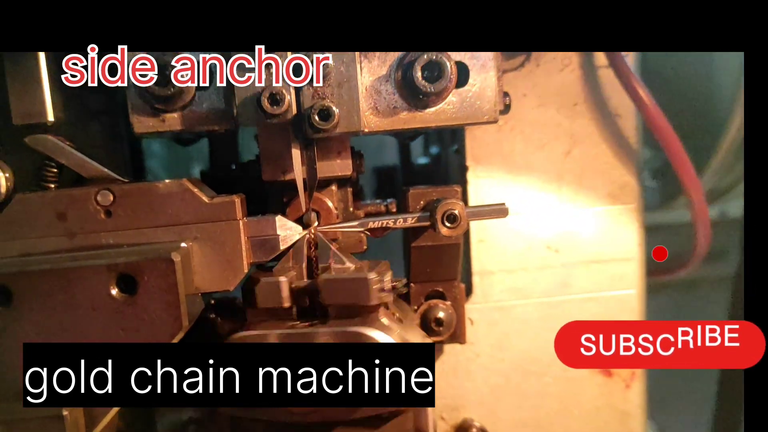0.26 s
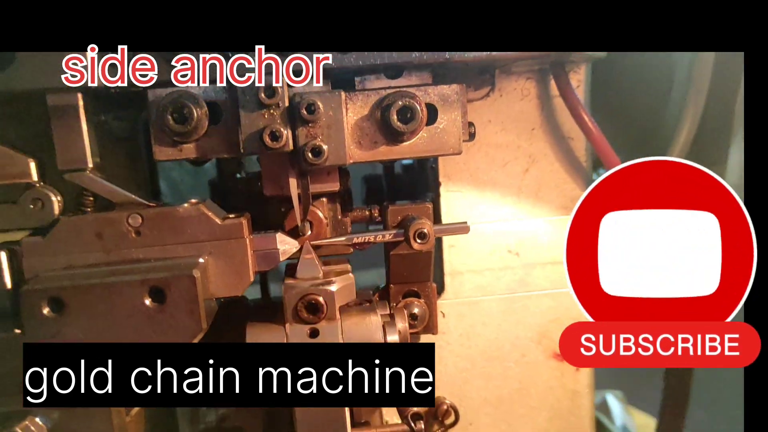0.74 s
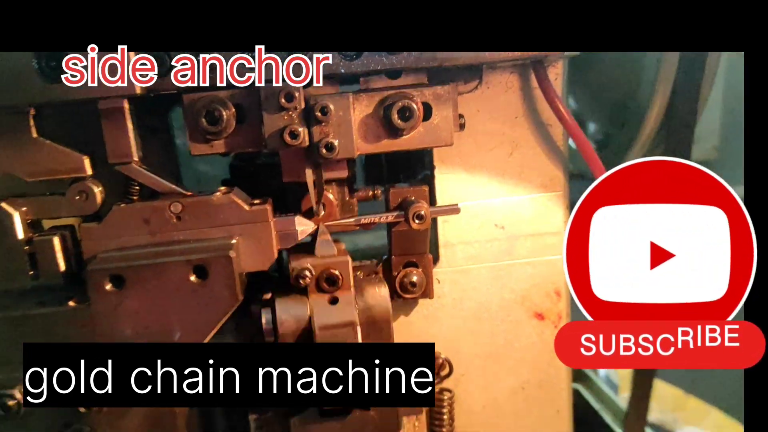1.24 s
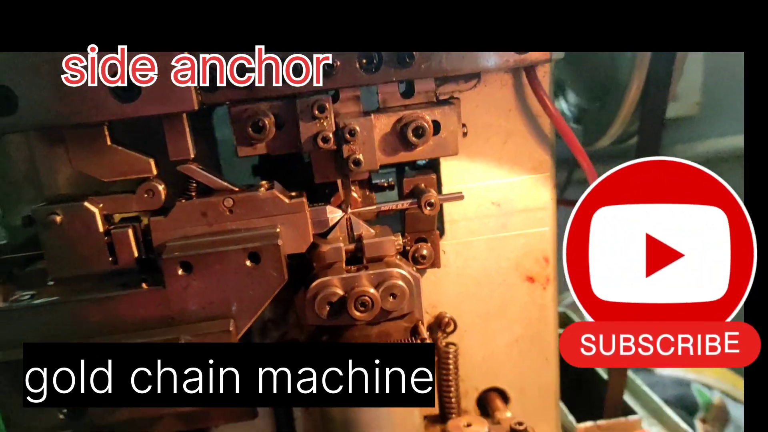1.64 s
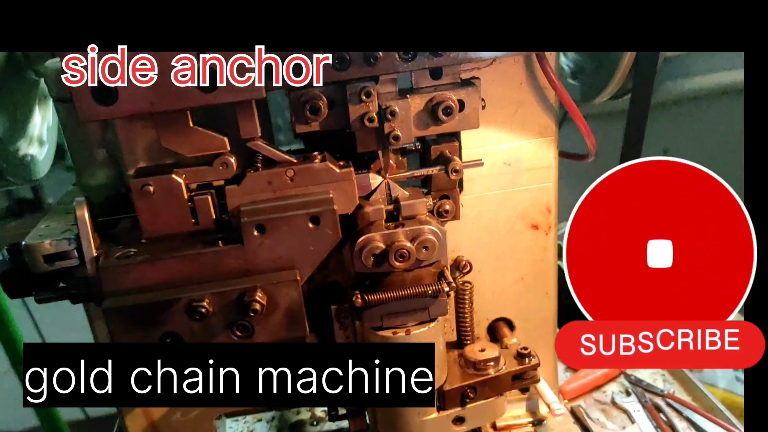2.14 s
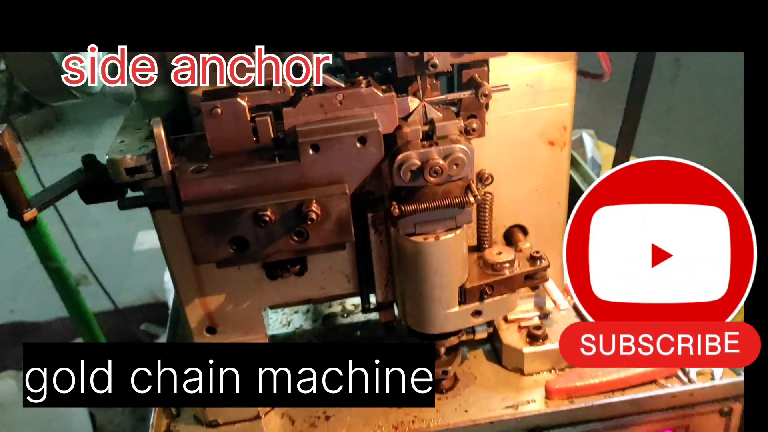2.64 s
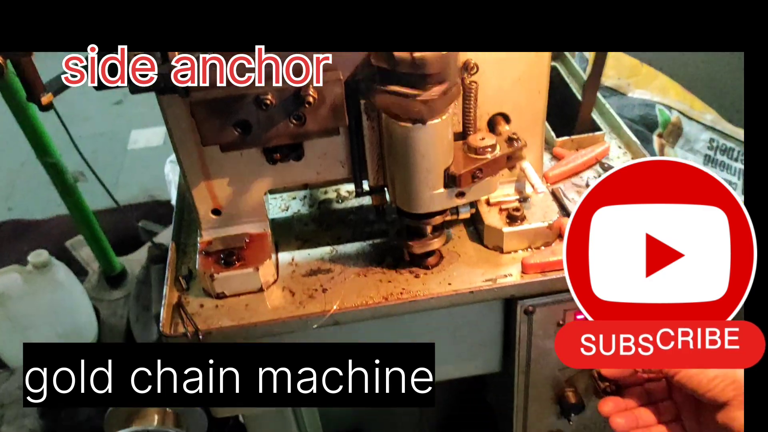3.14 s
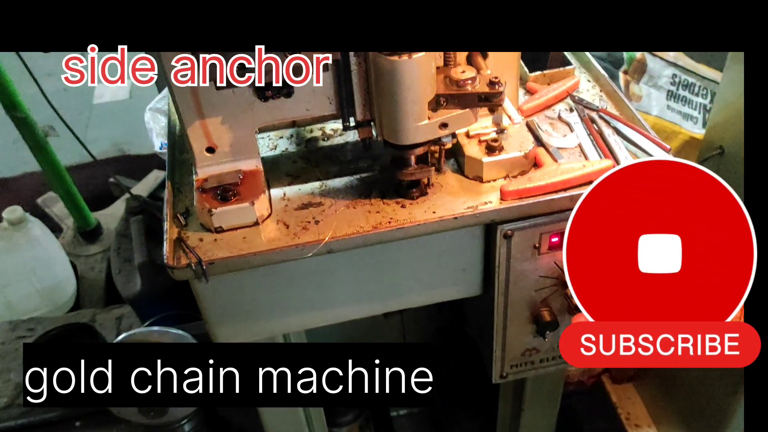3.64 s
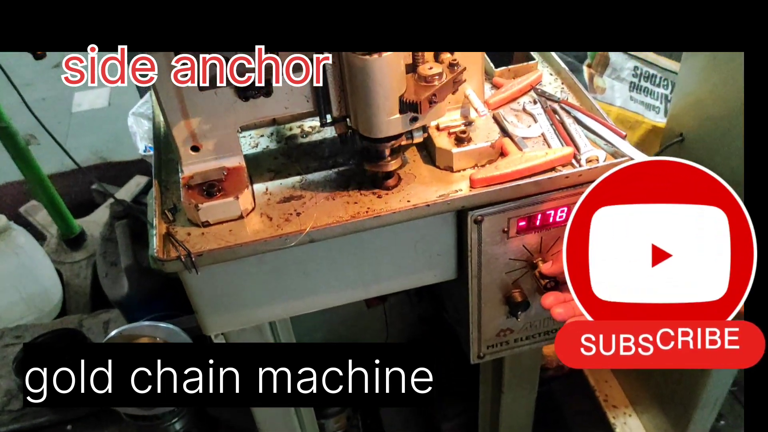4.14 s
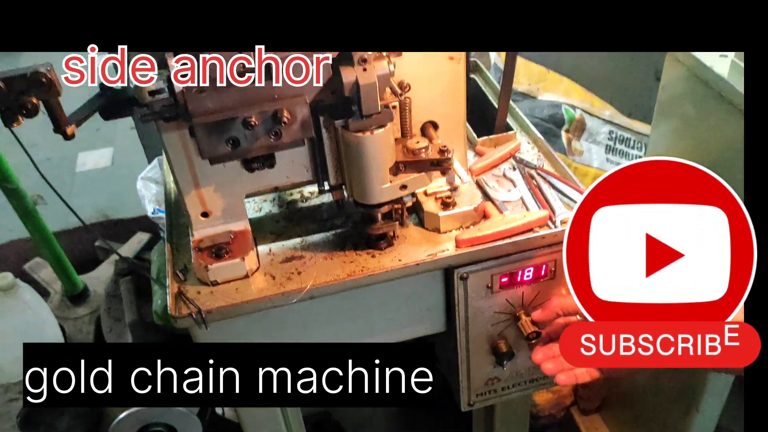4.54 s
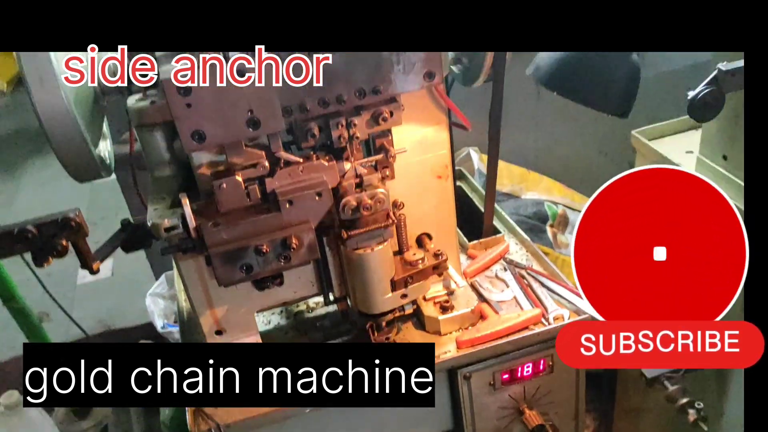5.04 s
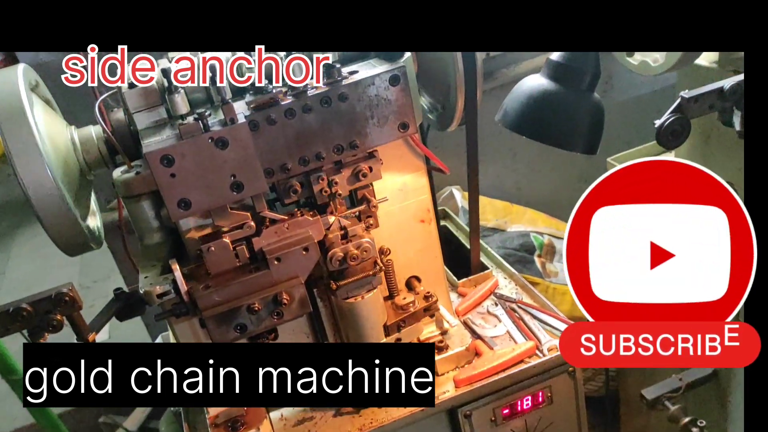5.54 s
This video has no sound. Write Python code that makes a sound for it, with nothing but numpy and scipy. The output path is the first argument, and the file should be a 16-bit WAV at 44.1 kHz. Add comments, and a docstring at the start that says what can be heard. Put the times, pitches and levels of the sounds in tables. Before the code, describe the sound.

A small chain-making machine clatters in a workshop, steel levers clanking and jaws snapping over a motor hum, speeding up within moments and then running steadily.

```python
"""A motor hum and a steady clatter of steel: a chain-making machine, close by in a small workshop, speeds up.
On every turn of the camshaft the same cams knock on the iron frame, clank the levers and swish the slides,
harder at higher speed. About once a turn the forming head snaps as it cuts a link. Other loose parts clack,
scrape and jangle; gears and wire feed tick underneath, and bench and walls throw the clatter back.
Most parts are bursts of noise rung through a filter; hum and knocks are sine waves."""
import sys
import numpy as np
from scipy import signal
from scipy.fft import rfft, irfft
from scipy.io import wavfile
from scipy.ndimage import uniform_filter1d

SR = 44100
rng = np.random.default_rng(int(sys.argv[2]) if len(sys.argv) > 2 else 0)


def transcribe(u):
    """Save the signal u as a 16-bit wav file named by the first command-line argument.

    u: samples, shape (n,) or (channels, n), limited to [-1, 1]; the rate is SR.
    q: integer samples, one column per channel.
    """
    v = np.clip(np.atleast_2d(u).T, -1, 1)
    q = np.round(v * 32767).astype(np.int16)
    wavfile.write(sys.argv[1], SR, q)


N = 255339
TIME = np.arange(N) / SR  # seconds
TURNS = np.arange(7)  # numbered turns of the camshaft
FULL_TURNS_PER_S = 1.2

# progress of the camshaft, which speeds up and then holds its pace: time_s, turns_made
CAMSHAFT = [(-1.19, -.5), (.233, .5), (.55, 0.6544), (.68, 0.8053), (.916, 1), (1.185, 1.2942),
            (1.488, 1.5), (1.765, 1.68), (2.025, 2), (2.491, 2.5), (2.96, 3), (3.38, 3.5), (3.82, 4),
            (4.224, 4.5), (4.655, 5), (5.062, 5.5), (5.5, 6), (6.5, 7)]
# knocks of the cams on the frame on every turn: place_turns, relative level_db, ring_hz
CAM_KNOCKS = [(.355, -27.5, 149), (.455, -33.5, 168), (0.649, -33, 157), (0.879, -23, 234)]


def amp(db):
    """Turns decibels into a plain gain."""
    return 10 ** (np.asarray(db) / 20)


def evened(x):
    """Scales to an rms of 1."""
    return x / np.sqrt(np.mean(x ** 2) + 1e-20)


def read(points, hz):
    """Reads a table of values against pitch, with pitch spaced by ratio."""
    f, value = np.transpose(points)
    return np.interp(np.log(hz + 1), np.log(f + 1), value)


def level(table):
    """Gain over time from a dB curve."""
    return amp(np.interp(TIME, *np.transpose(table)))


def add(mix, s, sound):
    """Mixes a sound in at time s."""
    part = mix[:, max(round(s * SR), 0):][:, :sound.shape[-1]]
    part += sound[..., :part.shape[-1]]


def colour(x, spectrum, ripple_db=0, size=2048, count=70):
    """Rings x through a causal filter of unit energy; random ripples give each part its own resonances."""
    hz = abs(np.fft.fftfreq(size, 1 / SR))
    ripples = np.interp(np.sqrt(hz), np.linspace(0, np.sqrt(SR / 2), count), 2 * rng.random(count) - 1)
    log_gain = np.log(amp(read(spectrum, hz) + ripple_db * ripples))
    # the phase that makes the filter answer as early as it can
    response = np.exp(np.conj(signal.hilbert(log_gain)))
    ring = np.fft.ifft(response).real[:size // 2]
    return signal.oaconvolve(x, ring[None] / np.linalg.norm(ring), axes=1)[:, :N]


def flutter(slow_hz, fast_hz, count=40):
    """Random wavering of rms 1: many slow sine waves with random starting points."""
    coarse = TIME[::64]
    rates_hz = np.geomspace(slow_hz, fast_hz, count)
    waves = sum(np.sin(2 * np.pi * (f * coarse + rng.random())) for f in rates_hz)
    return np.interp(TIME, coarse, evened(waves))


def impacts(size, per_s, spread_db, ring_s):
    """A run of small collisions of uneven force, each a brief burst that dies away."""
    force = amp(spread_db * np.minimum(rng.exponential(1, size), 3))
    force = force * (rng.random(size) < per_s / SR)
    power = signal.lfilter([1], [1, -np.exp(-2 / (ring_s * SR))], force ** 2)
    return evened(np.sqrt(power) * rng.standard_normal((2, size)))


def moment(turn):
    """Time at which the camshaft has made a given number of turns."""
    s, turns = np.transpose(CAMSHAFT)
    return np.interp(turn, turns, s)


def pace(turn):
    """Speed of the camshaft over one turn, in doublings from full speed."""
    return -np.log2((moment(turn + .5) - moment(turn - .5)) * FULL_TURNS_PER_S)


def effort(speed_db, load_db):
    """Gain over time: speed_db more per doubling of speed, and a load that swings twice a turn."""
    slack_at = 0.22  # place in the turn where the load first eases
    turn = np.interp(TIME, *np.transpose(CAMSHAFT))
    load = -np.cos(2 * np.pi * 2 * (turn - slack_at))
    return amp(speed_db * pace(turn) + load_db * load)


def every_turn(cams, speed_db, uneven_db):
    """Repeats a table of cams on each turn: rows of (s, gain, seconds per turn, the cam's other columns)."""
    rows = []
    for place, *rest in cams:
        turn = TURNS + place
        gain = amp(speed_db * pace(turn) + uneven_db * rng.standard_normal(len(turn)))
        turn_s = 2 ** -pace(turn) / FULL_TURNS_PER_S
        beats = zip(moment(turn), gain, turn_s)
        rows += [(*beat, *rest) for beat in beats if 0 <= beat[0] < N / SR]
    return rows


def snaps(tail_db=-10, tail_s=0.013, crack_db=-5):
    """Jaws and grippers crack brightly, strike again within milliseconds and ring on briefly."""
    # hard snaps of the forming head, at each cut and when a link catches:
    # start_s, relative level_db, chatter_s
    hard_snaps = [(0.2154, -19.5, 0.005), (0.2698, -16.5, 0.003), (0.574, -21.5, 0.0022),
                  (0.8845, -13, 0.0062), (0.9166, -10.5, 0.0035), (0.970, -22, 0.004), (1.351, -22, 0.002),
                  (1.5183, -11.5, 0.0023), (2.026, -9, 0.0014), (2.0918, -15, 0.0022),
                  (2.371, -16.5, 0.0037), (2.562, -18.5, 0.00088), (2.8083, -16, 0.0021),
                  (2.861, -14.5, 0.00091), (2.9593, -6.5, 0.0044), (3.724, -15.5, 0.0035),
                  (3.8215, -5.5, 0.0039), (4.6553, -9.5, 0.0055), (5.203, -19, 0.0045),
                  (5.4875, -8.5, 0.0042)]
    # light clicks of the grippers on every turn: place_turns, relative level_db, chatter_s
    light_clicks = [(.045, -20, 0.0031), (.075, -19, 0.0055), (.37, -20, 0.006), (.487, -26, .005),
                    (.668, -23, 0.0056), (.834, -22, 0.0069), (.886, -27, 0.0053), (.975, -19, 0.0085)]
    # colour of the jaws: pitch_hz, level_db
    jaw_colour = [(300, -21), (1200, -3), (2300, 4.5), (3100, -0.5), (4000, 5), (6500, 0.5), (8100, 1),
                  (10200, -24.5), (16000, -39)]
    crack_colour = [(3000, 3), (7500, -1), (10500, -20)]  # pitch_hz, level_db
    strike_s = .0011  # fade of one strike

    out, t = np.zeros((2, N)), TIME[:SR // 12]
    hard = [(s, amp(db), chatter_s) for s, db, chatter_s in hard_snaps]
    clicks = every_turn(light_clicks, speed_db=12, uneven_db=-0.5)
    light = [(s, gain * amp(db), chatter_s) for s, gain, _, db, chatter_s in clicks]
    for s, force, chatter_s in hard + light:
        again = chatter_s * np.array([0, rng.uniform(.2, .45), rng.uniform(.55, .8), 1])
        strikes = np.max([(t >= at) * np.exp(-abs(t - at) / strike_s) for at in again], axis=0)
        tail = amp(tail_db) * np.exp(-t / tail_s)
        chatter = rng.standard_normal((2, len(t))) * (strikes + tail)
        # the first crack is the same on both sides
        crack = rng.standard_normal(len(t)) * np.exp(-2 * t / strike_s) * np.ones((2, 1))
        ringing_jaws = colour(chatter, jaw_colour, ripple_db=3.5)
        add(out, s, force * (ringing_jaws + amp(crack_db) * colour(crack, crack_colour)))
    return amp(-7.5) * out


def levers(swell_s=0.00081, fall_s=0.026):
    """A lever meets its stop and rattles to rest in a run of tiny collisions."""
    # clanks of the levers on every turn: place_turns, relative level_db
    clanks = [(.003, -21), (.076, -21), (.156, -21.5), (.38, -22), (.482, -21.5), (.592, -21.5),
              (.664, -23), (.865, -18.5), (.9, -21)]
    # colour of the levers: pitch_hz, level_db
    lever_colour = [(200, -6.5), (1200, 5), (2600, 1), (3200, -3.5), (4200, -1.5), (7000, -12.5),
                    (10000, -36), (16000, -41)]
    out, t = np.zeros((2, N)), TIME[:SR // 6]
    shape = (1 - np.exp(-t / swell_s)) * np.exp(-t / fall_s)
    for s, gain, _, db in every_turn(clanks, speed_db=9.5, uneven_db=-0.5):
        rattle = impacts(len(t), per_s=500, spread_db=0.4, ring_s=0.0099)
        add(out, s, gain * amp(db) * colour(rattle * shape, lever_colour, ripple_db=1.0))
    return amp(-4) * out


def slides():
    """Each stroke or drag of a slide is a short, gritty swish with a colour of its own."""
    # strokes of the steel slides on every turn: place_turns, length_turns, relative level_db
    slide_strokes = [(.01, .07, -37.5), (.15, 0.039, -32.5), (.215, 0.05, -34.5), (.328, .075, -31),
                     (.48, 0.079, -34.5), (.727, 0.047, -34), (.82, 0.033, -31)]
    # further swishes, when the slides drag, at their own times: start_s, length_s, relative level_db
    slide_drags = [(0.236, 0.041, -36), (0.419, 0.074, -36), (1.708, 0.055, -35), (2.81, 0.064, -28.5),
                   (2.968, 0.071, -30), (4.089, 0.052, -32.5), (5.33, 0.098, -29.5)]
    # colour of the slides: pitch_hz, level_db
    slide_colour = [(1500, -13), (3300, -2.5), (4200, -9), (6400, 6), (8200, -4), (9080, -11),
                    (9700, -34.5), (16000, -32)]
    out = np.zeros((2, N))
    repeated = every_turn(slide_strokes, speed_db=2.5, uneven_db=-0.5)
    strokes = [(s, turns * turn_s, gain * amp(db)) for s, gain, turn_s, turns, db in repeated]
    scrapes = [(s, length_s, amp(db)) for s, length_s, db in slide_drags]
    for s, length_s, force in strokes + scrapes:
        size = round(max(length_s, .005) * SR)
        grit = impacts(size, per_s=2200, spread_db=1.2, ring_s=0.006)
        grit = grit * signal.windows.tukey(size, .5)  # soft start and end
        add(out, s, force * colour(grit, slide_colour, ripple_db=3.5, count=200))
    return out


def knocks(ring_s=0.035, swell_s=0.0097, thump_s=0.0167, thump_hz=212):
    """Each cam knock swells and dies in a low mode of the frame; the thumps of the ram die sooner."""
    # heavy thumps of the ram through the bench: start_s, relative level_db
    ram_thumps = [(0.087, -24), (1.34, -26), (2.084, -21.5), (2.403, -19), (2.863, -23), (4.197, -20.5),
                  (4.567, -27), (4.981, -22), (5.404, -22)]
    out, t = np.zeros((2, N)), TIME[:SR // 5]
    repeated = every_turn(CAM_KNOCKS, speed_db=1.5, uneven_db=0.0)
    cams = [(s, gain * amp(db), hz, ring_s) for s, gain, _, db, hz in repeated]
    ram = [(s, amp(db), thump_hz, thump_s) for s, db in ram_thumps]
    for s, force, hz, fall_s in cams + ram:
        shape = (1 - np.exp(-t / swell_s)) * np.exp(-t / fall_s)
        add(out, s, force * np.sin(2 * np.pi * hz * t) * shape / shape.max())
    return amp(-3.0) * out


def clacks(bounce_s=0.003, bounce_db=-3, fall_s=.0012, count=4):
    """A loose part falls against its stop, bounces a few times and rings in its own modes."""
    # clacks of loose steel parts: start_s, relative level_db, main_ring_hz
    part_clacks = [(0.269, -24, 2400), (.474, -26, 1510), (1.003, -20.5, 1780), (1.518, -21, 2700),
                   (2.41, -23, 1620), (2.584, -24, 1800), (2.846, -19.5, 1890), (3.302, -25, 1730),
                   (3.858, -22, 1960), (5.377, -19, 1690)]
    # colour of a loose part: multiple of the main ring, level_db
    part_colour = [(.25, -15), (1, 3), (1.3, -8), (3, -10), (8, -60)]
    out, t = np.zeros((2, N)), TIME[:SR // 16]
    for s, db, hz in part_clacks:
        strikes = np.zeros((2, len(t)))
        for k in range(count):
            burst = rng.standard_normal((2, len(t))) * np.exp(-t / fall_s)
            add(strikes, bounce_s * k, amp(bounce_db * k) * burst)
        body = [(hz * multiple, gain_db) for multiple, gain_db in part_colour]
        add(out, s, amp(db) * colour(strikes, body, ripple_db=6.0, count=160))
    return amp(2.5) * out


def jangle(lean_db=-7, count=6):
    """Small steel pieces tumble together, each with its own high resonances; the clatter swells and thins out."""
    # one jangle of loose steel, off to the right: start_s, length_s, relative level_db
    s, length_s, db = (5.028, 0.078, -20.5)
    # colour of the small pieces: pitch_hz, level_db
    piece_colour = [(1000, -12), (2400, -2), (6500, 3.5), (9500, -10.5), (16000, -26)]
    out = np.zeros((2, N))
    u = np.linspace(0, 2, round(2 * length_s * SR))
    swell = evened(u ** 2 * np.exp(-7 * u))
    for _ in range(count):
        hits = impacts(len(u), per_s=220, spread_db=2.5, ring_s=.0015)
        add(out, s, colour(hits * swell, piece_colour, ripple_db=11, count=200))
    return amp(db) * amp([[lean_db], [0]]) * out / count  # left side weaker


def motor():
    """A magnetic hum that wavers at random in level and phase, over low tones that grow with speed."""
    # level of the motor hum: time_s, level_db
    hum_level = [(0, -37), (.75, -39), (1.6, -32.5), (1.9, -36), (2.85, -31.5), (3.85, -32.5),
                 (4.25, -28.5), (4.8, -35.5), (5.79, -33.5)]
    # weaker low tones of frame and motor at full speed: pitch_hz, level_db
    low_tones = [(143, -46), (333, -44)]
    hum_hz = 200.2
    wavering = amp(2.0 * flutter(2, 22))
    hum = wavering * np.sin(2 * np.pi * hum_hz * TIME + .38 * flutter(.8, 14))
    tones = sum(amp(db) * np.sin(2 * np.pi * hz * TIME + 1.78 * flutter(0.311, 5.8))
                for hz, db in low_tones)
    # a sine's peak is root 2 times its rms
    return np.sqrt(2) * (level(hum_level) * hum + tones * effort(speed_db=6.5, load_db=0))


def frame(surge=0.23, surge_s=0.024):
    """The turning camshaft keeps the iron frame rumbling, hardest just after each knock."""
    # colour of the frame: pitch_hz, level_db
    frame_colour = [(20, -25), (45, -19.5), (110, -14.5), (150, -3), (240, 2), (310, -5.5), (400, -15.5),
                    (700, -13.5), (2000, -114.5)]
    shake = evened(colour(rng.standard_normal((2, N)), frame_colour))
    blows = np.concatenate([moment(TURNS + place) for place, _, _ in CAM_KNOCKS])
    coarse = TIME[::64]
    surges = sum(np.exp(-((coarse - s) / surge_s - .5) ** 2) for s in blows)
    load = np.interp(TIME, coarse, surges)
    wavering = amp(1.83 * flutter(3, 24))
    return amp(-33.0) * shake * effort(speed_db=1.0, load_db=1.0) * (1 + surge * load) * wavering


def gears():
    """Gears and cam followers grumble and tick without a pause, as a dense run of small collisions."""
    # colour of the gears: pitch_hz, level_db
    gear_colour = [(150, -26), (350, -1.5), (480, -0.5), (660, -3.5), (810, 0), (1100, -3), (2600, -8.5),
                   (3300, -14), (5200, -18), (7400, -8), (9800, -36.5), (16000, -48.5)]
    mesh = impacts(N, per_s=1000, spread_db=2.6, ring_s=.0075)
    grumble = evened(colour(mesh * amp(0.26 * flutter(5.5, 45)), gear_colour))
    return amp(-30.5) * grumble * effort(speed_db=2.0, load_db=-0.24)


def feed(count=8):
    """The wire feed and the finished chain tick lightly against several steel guides."""
    # level of the feed rattle, which grows overall as the machine speeds up: time_s, relative level_db
    feed_level = [(0, -54), (1.6, -41.5), (2.75, -50), (3, -36), (3.8, -33), (4.7, -33), (5.2, -35),
                  (5.79, -33.5)]
    # colour of the guides: pitch_hz, level_db
    guide_colour = [(1200, -14), (2400, 2.5), (3300, -4.5), (4200, -1), (5200, 3), (6500, 2), (8000, -6),
                    (10000, -18), (16000, -38)]
    ticks = [impacts(N, per_s=50, spread_db=2.0, ring_s=.007) for _ in range(count)]
    rattle = evened(sum(colour(guide, guide_colour, ripple_db=5.5) for guide in ticks))
    return rattle * level(feed_level) * effort(speed_db=1.0, load_db=1.5)


def rustles():
    """Thin, gritty hiss of steel rubbing, quick to start and slow to fade."""
    # rustles of steel: start_s, length_s, relative level_db
    steel_rustles = [(3.006, 0.86, -56)]
    out = np.zeros((2, N))
    for s, length_s, db in steel_rustles:
        u = np.maximum(TIME - s, 0) / (length_s / 4)
        swell = u * np.exp(1 - u)
        out += amp(db) * swell * impacts(N, per_s=300, spread_db=2.5, ring_s=.004)
    return colour(out, [(2000, -27), (8000, 7), (13000, -1.5), (16000, -13)])  # pitch_hz, level_db


def ringing(x, patch_db, count=12, size=1024):
    """Random narrow patches of pitch and time rise and fall, mostly in the treble."""
    overlap = size - size // 4
    hz, _, z = signal.stft(x, SR, nperseg=size, noverlap=overlap)
    # partly shared by the two sides
    patches = rng.standard_normal(z.shape[1:]) + .5 * rng.standard_normal(z.shape)
    patches = uniform_filter1d(patches, count, axis=2)
    patches = evened(uniform_filter1d(patches, size=3, axis=1))
    depth = np.clip(hz / 3500, 0, 1)[:, None] ** .4
    gain = amp(patch_db * depth * np.clip(patches, -2, 2))
    gain /= np.sqrt(np.mean(gain ** 2, axis=(0, 2), keepdims=True))
    return signal.istft(z * gain, SR, nperseg=size, noverlap=overlap)[1][:, :N]


def room(x):
    """Scattered reflections from bench and walls die away quickly."""
    t60_s = 0.17  # time to fall by 60 dB
    t = TIME[:SR // 2]
    tail = rng.standard_normal((2, len(t))) * (t > .004) * amp(-60 * t / t60_s)
    return signal.fftconvolve(x, tail / np.linalg.norm(tail[0]), axes=1)[:, :N]


def spread(x):
    """Long waves reach both ears much alike; short ones arrive nearly unrelated."""
    # how alike left and right are: pitch_hz, likeness (0 to 1)
    likeness = [(60, 0.49), (130, 0.95), (290, 0.95), (640, 0.41), (1500, 0.033)]
    a, b = rfft(x)
    same = np.clip(read(likeness, np.fft.rfftfreq(N, 1 / SR)), -1, 1)
    return irfft(np.array([a, same * a + np.sqrt(1 - same ** 2) * b]), N)


def scene():
    """Mixes the machine, its echoes and its motor."""
    head, loose, works = snaps() + jangle(), clacks(), levers() + slides()
    echo = room(amp(-3) * (head + loose) + amp(-5.5) * works)
    steel = ringing(gears() + feed() + works + rustles() + echo, patch_db=4.4)
    return spread(frame() + steel + head + loose) + motor() + knocks()


def record(dry):
    """The two microphone ports have their own colour; then the highest treble is cut off."""
    # balance of the two sides: pitch_hz, left_minus_right_db
    balance = [(60, 0.5), (200, 4), (2400, 0), (4000, 2), (6400, -5.5), (8100, 5), (10000, -2)]
    edge_hz = 15800
    lean_db = read(balance, np.fft.rfftfreq(N, 1 / SR))
    ports = irfft(rfft(dry) * amp(np.array([lean_db, -lean_db]) / 2), N)
    low_pass = signal.firwin(511, edge_hz, window=("kaiser", 9), fs=SR)
    return signal.oaconvolve(ports, low_pass[None], "same")


dry = scene()
out = record(dry)
transcribe(out)
```